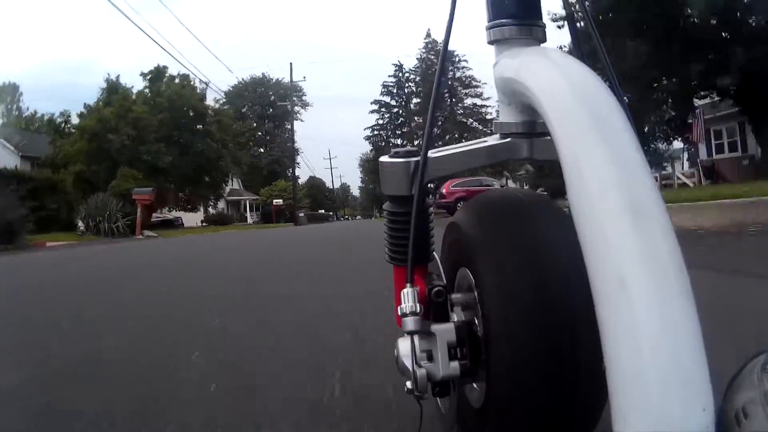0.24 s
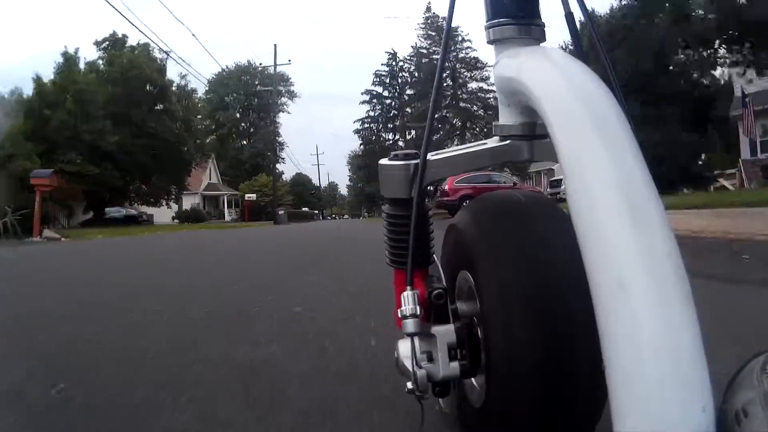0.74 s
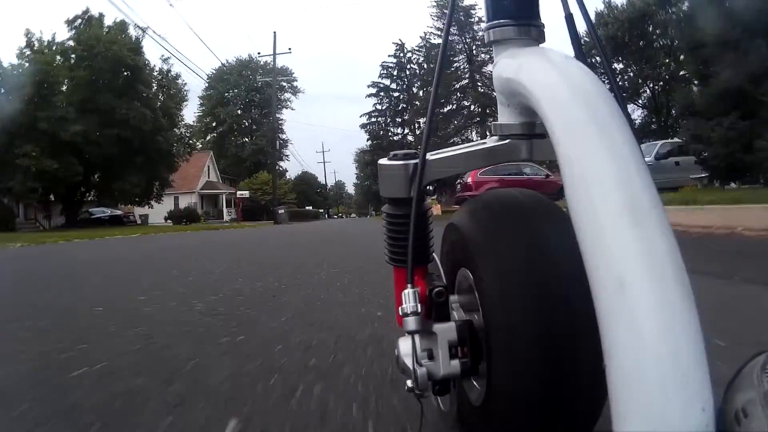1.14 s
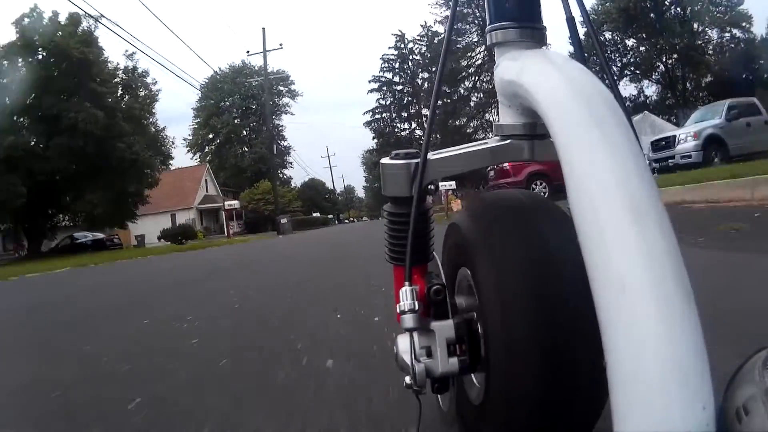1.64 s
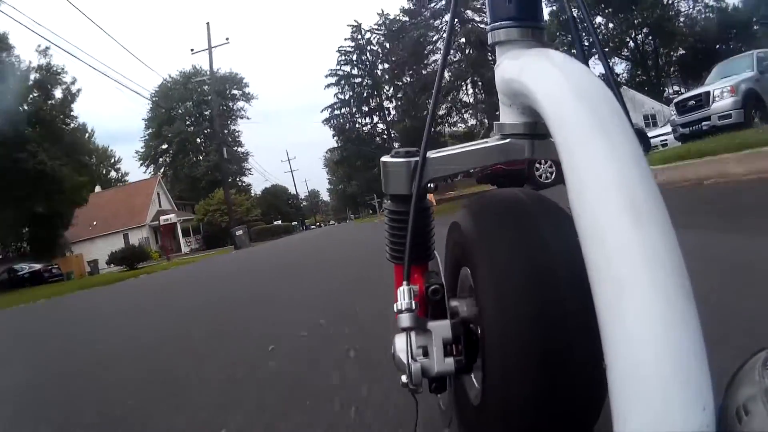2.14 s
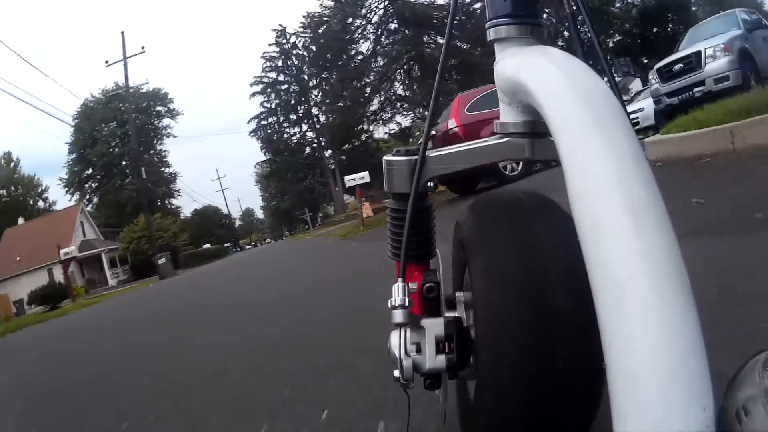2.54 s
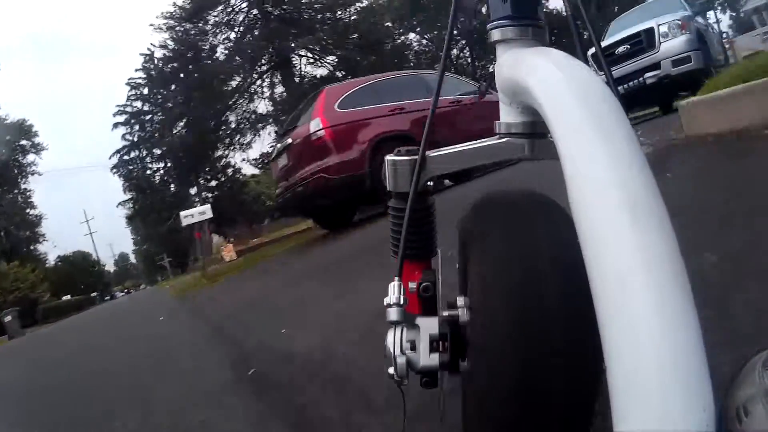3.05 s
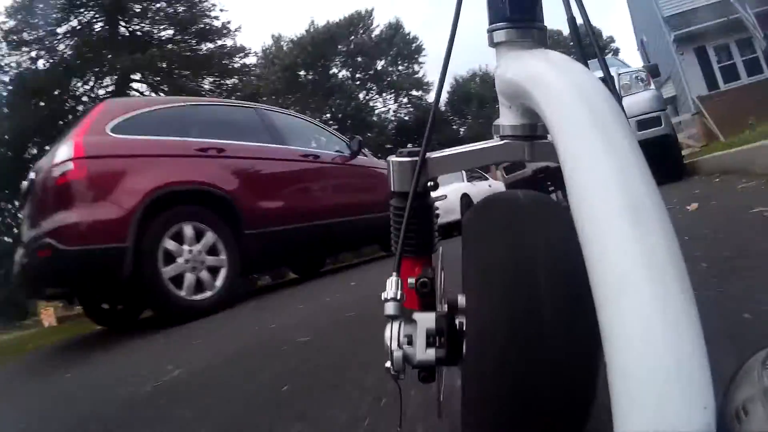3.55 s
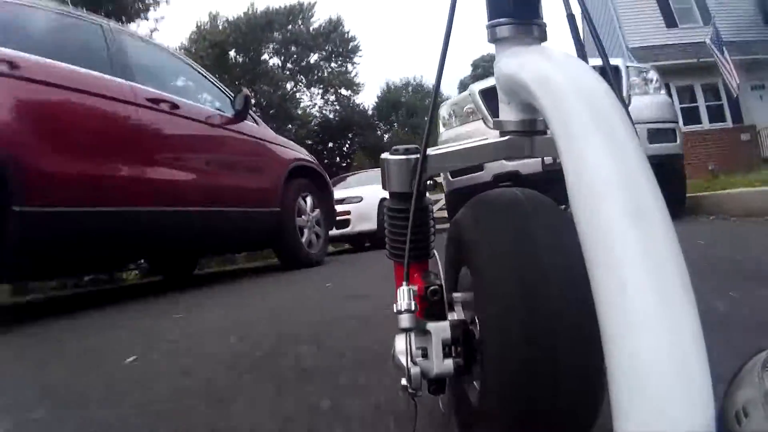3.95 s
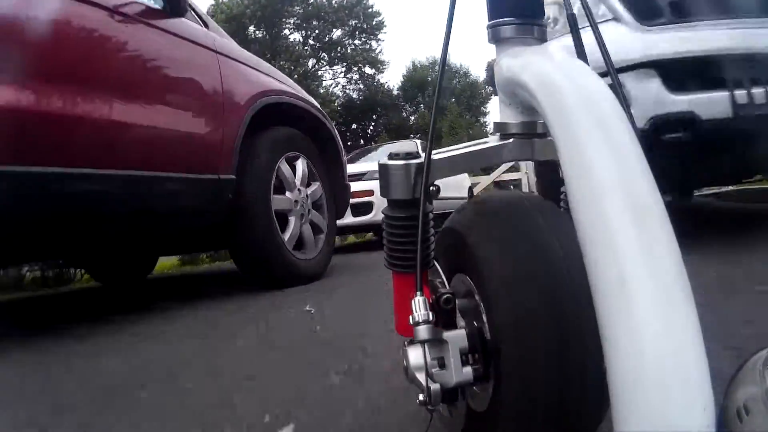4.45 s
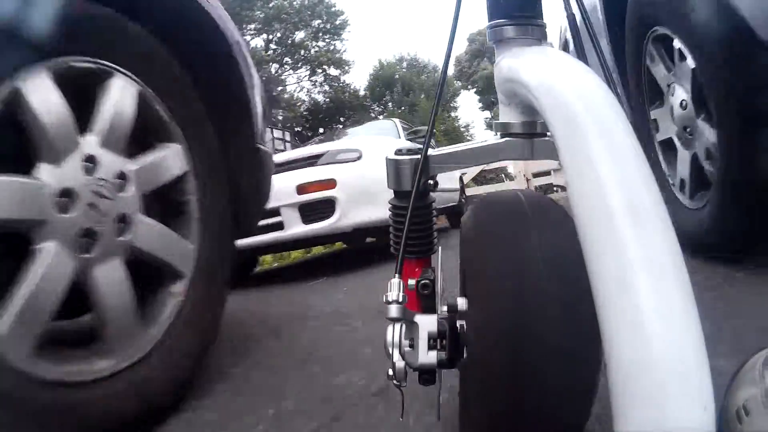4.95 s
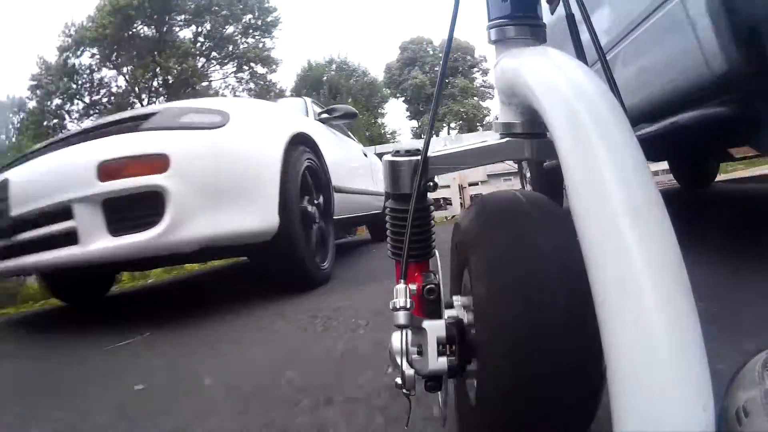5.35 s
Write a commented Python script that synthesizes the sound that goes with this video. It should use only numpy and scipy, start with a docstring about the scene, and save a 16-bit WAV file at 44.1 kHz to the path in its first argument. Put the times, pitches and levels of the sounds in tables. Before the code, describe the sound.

A small two-stroke scooter engine starts loud and distorted, winds down in pitch and level, then settles into a quiet, uneven buzzing idle.

```python
"""A small two-stroke scooter slows down a street and rolls on near idle, heard from its own frame.
Engine: uneven pops and gated gas noise through an exhaust and frame response, plus a hum of crank orders.
Drive: a gliding, throbbing tone. Metal: scratch envelopes on coloured noise. Fork: noise puffs and thuds.
Frame and road: resonant noise and low rumble. The loud start overloads the microphone into flat tops."""
import sys
import numpy as np
from scipy import signal
from scipy.io import wavfile
from scipy.ndimage import uniform_filter1d

SR = 44100
rng = np.random.default_rng(int(sys.argv[2]) if len(sys.argv) > 2 else 0)


def makeup_ratio(level_db):
    """Linear amplitude ratio for a level in decibels (20 dB per factor of ten)."""
    decades = np.asarray(level_db, float) / 20
    return 10 ** decades


def digitize_waveform(pressure):
    """Quantize a signal to 16-bit integers and store it at the path in sys.argv[1].

    Rows of a 2-D input are taken as channels; values are limited to [-1, 1].
    """
    field = np.atleast_2d(pressure).T
    bounded = np.clip(field, -1, 1)
    quanta = np.round(bounded * 32767).astype(np.int16)
    wavfile.write(sys.argv[1], SR, quanta)


N = 246519  # samples


def evened(x):
    """Scales to rms 1."""
    return x / np.sqrt(np.mean(x ** 2) + 1e-20)


def along(rows):
    """Interpolates each column of a time table to one value a sample."""
    s, *columns = np.transpose(rows)
    return [np.interp(np.arange(N) / SR, s, c) for c in columns]


def drift(hz):
    """Low-passed noise of rms 1 with corner hz, for slow random modulation."""
    lowpass = signal.butter(2, hz, fs=SR, output="sos")
    return evened(signal.sosfilt(lowpass, rng.standard_normal(N + SR))[SR:])  # skips the filter's onset


def causal(points, rings=()):
    """Minimum-phase impulse response of a (Hz, dB) spectrum with resonant peaks on top."""
    hz = abs(np.fft.fftfreq(8192, 1 / SR))
    f, db = np.transpose(points)
    gain_db = np.interp(np.log(hz + 1), np.log(f + 1), db)
    for centre_hz, width_hz, peak_db in rings:
        gain_db = gain_db + peak_db / (1 + (2 * (hz - centre_hz) / width_hz) ** 2)
    log_gain = np.log(makeup_ratio(gain_db))
    phase = -signal.hilbert(log_gain).imag
    return np.fft.ifft(np.exp(log_gain + 1j * phase)).real[:4096]


def body():
    """Impulse response of exhaust and frame: a broad colour with ringing peaks."""
    # exhaust colour: (frequency [Hz], relative gain [dB])
    exhaust = [(20, -25.5), (60, -20.5), (100, -2.5), (220, -6), (500, -7.5), (950, -20), (1500, -27.5),
               (2100, -33.5), (2600, -41), (3200, -52), (4200, -61), (6000, -79), (9000, -94), (15000, -76)]
    # ringing of pipe and frame on top: (centre [Hz], width [Hz], peak [dB])
    rings = [(512, 180, 3.5), (1271, 314, 12), (1780, 380, 8), (749, 54, 3.5), (960, 72, 2)]
    return causal(exhaust, rings)


def struck(times_s, peaks_db, shape):
    """Places shape at each time with its peak level."""
    train = np.zeros(N)
    train[np.round(times_s * SR).astype(int)] = makeup_ratio(peaks_db)
    return signal.oaconvolve(train, shape / abs(shape).max())[:N]


def beats(turns, count, jitter, spread_db):
    """Clicks count times a turn, each a little off its place and of its own size."""
    luck = np.clip(rng.standard_normal((N // 64, 2)), -2, 2)[(count * turns).astype(int)]
    phase = (count * turns - jitter * luck[:, 1]) % 1
    return makeup_ratio(spread_db * luck[:, 0]) * (np.diff(phase, prepend=0) < -.5)


def burst(rise_s, fall_s):
    """Envelope of a short scratch: exponential rise and decay."""
    t = np.arange(500) / SR
    return (1 - np.exp(-t / rise_s)) * np.exp(-t / fall_s)


def lulls():
    """Brief Gaussian dips of the level, in dB."""
    # dips: (time [s], depth [dB], half width to 1/e [s])
    dips = [(.452, 4.5, 0.057), (0.727, 5.5, 0.024), (1.894, 4, 0.11), (2.722, 5, 0.012), (3.6, 0.5, 0.018),
            (3.721, 4, 0.041), (3.95, 2.5, 0.018), (5.311, 4.5, 0.01)]
    t = np.arange(N) / SR
    return sum(-db * np.exp(-((t - s) / width) ** 2) for s, db, width in dips)


def road():
    """Low lumpy rumble of tyres and air: band-passed noise of drifting level."""
    band = signal.butter(2, [15, 65], "band", fs=SR, output="sos")
    low = signal.sosfilt(band, rng.standard_normal(N))
    return makeup_ratio(-43.0 + 1.7 * drift(5.6)) * evened(low)


def hollow(turns):
    """Hollow ring of the frame, fed by the engine's shaking: resonant noise, throbbing once a turn."""
    # resonance: (time [s], centre [Hz], level [dB])
    resonance = [(0, 1313, -19.5), (.3, 1320, -20.5), (.7, 1356, -24.5), (.75, 1316, -26), (1, 1343, -29.5),
                 (1.4, 1340, -28.5), (1.9, 1336, -32), (2.3, 1322, -34.5), (2.7, 1350, -33),
                 (3.1, 1340, -34), (3.5, 1290, -34.5), (3.9, 1330, -37.5), (4.3, 1280, -36.5),
                 (4.8, 1313, -33), (5.2, 1344, -38), (5.59, 1295, -33)]
    width_hz, throb = 256, 0.37
    hz, level_db = along(resonance)
    carrier = np.exp(2j * np.pi * np.cumsum(hz) / SR)
    pole = np.exp(-np.pi * width_hz / SR)
    # filter around 0 Hz, then shift up to the moving centre
    low = signal.lfilter([1], np.poly([pole, pole]), rng.standard_normal(N) / carrier)
    swell = 1 + throb * np.cos(2 * np.pi * (turns - .2))
    return makeup_ratio(level_db + lulls()) * swell * evened((low * carrier).real)


def jolts():
    """Jolts through the fork: puffs of frame noise with a bright edge, over a thud and a low push."""
    # jolts: (time [s], peak level [dB], thud and push against puff [ratio], puff decay [s])
    hits = [(0.494, -6, 0.041, 0.0031), (0.836, -6, .05, 0.002), (1.24, -3, 0.11, 0.0041),
            (2.068, -16, 0.057, 0.0037), (2.273, -12, .02, 0.015), (2.329, -10, .02, 0.005),
            (2.369, -14.5, 0.023, 0.0068), (3.137, -7, 0.76, 0.0035), (3.225, -18.5, .2, 0.002),
            (3.335, -18, .03, 0.0036), (3.363, -10, 0.043, 0.012), (3.436, -9, 0.077, 0.0029),
            (3.641, -12.5, .05, 0.0057), (4.119, -15, .05, 0.0045), (4.236, -16, 0.12, 0.007)]
    push_hz, thud_hz = 28, 140
    t = np.arange(3000) / SR
    push = .5 * np.sin(2 * np.pi * push_hz * t) * np.exp(-t / 0.018)
    push = push - np.sin(2 * np.pi * thud_hz * t) * np.exp(-t / 0.009)
    out = np.zeros(N)
    for s, peak_db, depth, decay_s in hits:
        noise = signal.oaconvolve(rng.standard_normal(3000), body())[:3000]
        hiss = uniform_filter1d(rng.standard_normal(3000), size=3)
        puff = noise + 6 * np.gradient(noise) + 0.032 * depth * noise.std() * hiss
        puff = puff * (1 - np.exp(-t / (0.5 * decay_s))) * np.exp(-t / decay_s)
        out += struck(np.array([s]), peak_db, puff / abs(puff).max() + depth * push)
    return out


def ticks(turns):
    """Short metal scratches: the clear ones, a snap at each firing and light ticks between."""
    # clear ticks: (time [s], envelope peak before colouring [dB])
    clinks = [(0.1428, -18.5), (0.1806, -31), (0.2264, -25.5), (0.292, -13.5), (0.3183, -15.5),
              (0.3561, -20), (0.4394, -24.5), (0.4893, -24), (0.5467, -22), (0.5752, -15), (0.6526, -17.5),
              (0.7192, -33), (0.7538, -22), (0.7848, -21), (0.8355, -18), (0.8645, -24.5), (0.8801, -19),
              (0.9221, -26.5), (0.9617, -24.5), (0.9817, -32), (1.043, -23.5), (1.1026, -28.5),
              (1.126, -18.5), (1.177, -30.5), (1.1961, -28), (1.2382, -29.5), (1.2817, -34), (1.3124, -30),
              (1.3318, -32), (1.398, -30), (1.502, -36.5), (1.5369, -31), (1.5526, -28), (1.584, -34.5),
              (1.6158, -38), (1.6325, -25.5), (1.716, -39), (1.731, -25.5), (1.768, -38), (1.7829, -27.5),
              (1.8372, -38), (1.8432, -36), (2.0118, -33), (2.0577, -31), (2.1211, -43), (2.134, -35.5),
              (2.1858, -31.5), (2.2318, -28), (2.2872, -47), (2.3267, -32.5), (2.367, -36), (2.5651, -38),
              (2.6518, -38), (2.6758, -38.5), (2.6972, -27.5), (2.8745, -31), (2.8928, -25.5),
              (2.9983, -38.5), (3.047, -34.5), (3.127, -34.5), (3.1333, -25.5), (3.1652, -37),
              (3.224, -37.5), (3.2503, -32), (3.3315, -45), (3.4331, -36), (3.5039, -38.5), (3.5436, -31.5),
              (3.576, -34.5), (3.6192, -58), (3.647, -44), (3.7669, -31), (3.8157, -35), (3.8674, -40),
              (3.9577, -44), (3.9823, -39), (4.0492, -36), (4.1215, -35), (4.1413, -40.5), (4.2017, -34.5),
              (4.2644, -39.5), (4.2844, -32.5), (4.3455, -25.5), (4.4102, -35.5), (4.4646, -35),
              (4.5131, -33), (4.7147, -39.5), (4.7591, -29), (4.797, -38), (4.816, -39.5), (4.8339, -31.5),
              (4.8556, -30), (4.8678, -38.5), (4.915, -31), (4.9542, -48), (4.972, -29), (4.9946, -35),
              (5.038, -33.5), (5.119, -38), (5.2234, -33.5), (5.2666, -33), (5.2826, -28.5),
              (5.4132, -35.5), (5.441, -31), (5.479, -41)]
    # running gear: (time [s], snap level [dB], light tick level [dB], fitfulness of light ticks [dB])
    chatter = [(0.0, -31.5, -33, 7.5), (0.2, -42, -36.5, 9), (0.36, -37, -35, -4.5), (.45, -41, -41, 11),
               (.6, -40.5, -36.5, 3), (.8, -39, -45.5, 6), (0.98, -41, -50.5, -1), (1.3, -47, -55.5, 1),
               (1.6, -48.5, -61, 17), (1.93, -51, -57.5, 13), (2.22, -44.5, -57, -2), (2.49, -53, -58, 6.5),
               (3.0, -57, -61, 12), (3.32, -53.5, -60, 4), (3.63, -64.5, -62, 18.5), (4.09, -73, -60, -7),
               (4.44, -56, -48.5, 12), (4.6, -64.5, -53.5, 11), (4.93, -47, -47, 2.5),
               (5.06, -52, -57, -1.5), (5.26, -58.5, -54, 5), (5.59, -77, -60, 11)]
    # colour of clear and light ticks: (frequency [Hz], relative gain [dB])
    tick_colour = [(500, -35.5), (1800, 10), (2800, -5), (3900, 2), (4800, -8), (6300, -21.5),
                   (8000, -26.5), (11000, -40), (15000, -53.5)]
    # colour of snaps: (frequency [Hz], relative gain [dB])
    snap_colour = [(500, -21), (1800, 7.5), (2800, 2), (3900, -1.5), (4800, -10.5), (6300, -25.5),
                   (8000, -34.5), (11000, -35.5), (15000, -44)]
    snap_at, light_at = .05, .6  # turns
    rattle_db, rattle_hz = 1.2, 15  # swell of the snaps
    grouping_db, fits_hz = 4, 12  # gathering and fits of the light ticks
    edge_per_octave = 1  # extra treble per octave of crank speed above 50 turns/s

    snap_db, light_db, fits_db = along(chatter)
    dips_db = 1.2 * lulls()
    snap_db = snap_db + dips_db + rattle_db * drift(rattle_hz)
    light_db = light_db + dips_db + grouping_db * np.cos(2 * np.pi * (turns - light_at))
    light_db = light_db + fits_db * np.minimum(drift(fits_hz), 1)

    clear = struck(*np.transpose(clinks), burst(0.0004, 0.001))
    snap_clicks = beats(turns - snap_at + 1, count=1, jitter=.03, spread_db=2.8)
    snaps = signal.oaconvolve(snap_clicks, burst(.0004, .0018))[:N]
    light_clicks = beats(turns, count=4, jitter=0.12, spread_db=2.8)
    light = signal.oaconvolve(light_clicks, burst(0.0002, 0.0006))[:N]

    tick_envelope = clear + evened(light) * makeup_ratio(light_db)
    snap_envelope = evened(snaps) * makeup_ratio(snap_db)
    out = np.zeros(N)
    for envelope, points in ((tick_envelope, tick_colour), (snap_envelope, snap_colour)):
        colour = causal(points)
        scratch = envelope * rng.choice([-1., 1.], N)
        out += signal.oaconvolve(scratch, colour / np.linalg.norm(colour))[:N]
    octaves = np.maximum(np.log2(np.gradient(turns) * SR / 50), 0)
    return out - edge_per_octave * octaves * np.gradient(np.gradient(out))


def drone(turns):
    """Drone of the drive while braking: a wavering tone, throbbing at half the crank speed."""
    # glide: (time [s], frequency [Hz], level [dB])
    glide = [(1.55, 492, -46), (1.64, 486, -34), (1.68, 483, -21), (1.76, 472, -29.5), (1.876, 455, -29),
             (1.999, 436, -61), (2.08, 424, -28), (2.124, 421, -25), (2.221, 412, -26.5), (2.311, 403, -22),
             (2.385, 398, -21.5), (2.42, 394, -28.5), (2.55, 382, -27), (2.68, 370, -27), (2.717, 372, -40),
             (2.762, 392, -27), (2.861, 397, -31), (2.95, 398, -36), (3.061, 402, -27.5),
             (3.201, 405.6, -47), (3.294, 393, -18), (3.322, 394, -36), (3.354, 394, -19.5),
             (3.393, 385, -37), (3.43, 377, -29), (3.6, 360, -41)]
    hz, level_db = along(glide)
    t = np.arange(N) / SR
    sounding = np.clip(np.minimum(t - glide[0][0], glide[-1][0] - t) / 0.017, 0, 1)
    tone = np.cos(2 * np.pi * np.cumsum(hz) / SR + .55 * drift(18))
    throb = 1 + .5 * np.cos(np.pi * turns)
    return np.sqrt(2) * makeup_ratio(level_db + 1.4 * drift(42)) * throb * sounding * tone


def hum(turns, level_db, shake_db, even):
    """Once-a-turn shake and the clean low orders above it, lined up into one rounded push a turn."""
    # orders against the second: (time [s], third [dB], fourth [dB], fifth [dB])
    order_mix = [(0, -6.5, -4, -11), (.2, -11, -5.5, -7), (.35, -3.5, 0.5, 3.5), (.6, -8, -2.5, 5.5),
                 (.75, -11, -1, -5.5), (1.05, -12, 1, 0), (1.4, -1, -2.5, -5), (1.75, -5, -6.5, -2),
                 (2.1, -2.5, 0.5, -13), (2.8, -1, -3, -10.5), (3.6, 4, 2, -4.5), (4.2, -3, -0.5, -9),
                 (4.6, -1, -2, -16), (5.0, -1.5, -1, -13.5), (5.59, -5.5, -5, -8)]
    fall_db = -3  # each order above the fifth
    waver_db = 1  # each order swells and fades on its own
    third_db, fourth_db, fifth_db = along(order_mix)
    orders_db = [0, third_db, fourth_db] + [fifth_db + fall_db * k for k in range(3)]
    out = np.sqrt(2) * makeup_ratio(shake_db + 0.82 * drift(15)) * np.cos(2 * np.pi * turns - 1.13)
    for k, order_db in enumerate(orders_db, start=2):
        swell_db = waver_db * np.minimum(drift(6.8), 1.2) + 2.1 * (1 - even) * drift(22.0)
        phase = 2 * np.pi * k * turns - 1.08 * k + .5 * (1 - even) * drift(19.0)
        out = out + np.sqrt(2) * makeup_ratio(level_db + order_db + swell_db) * np.cos(phase)
    return out


def engine(turns, level_db, even):
    """One pop a turn of uneven strength, and the rush of gas that swells around each pop."""
    # pops against the engine level: (time [s], level [dB])
    pop_level = [(0, -12.5), (.4, -11.5), (.75, -8.5), (1, -8.5), (1.3, -7), (1.7, -14), (2.5, -10),
                 (3.8, -14), (4.4, -7), (5.1, -17), (5.59, -13.5)]
    least_uneven_db, uneven_db = 1.5, 2.5  # least spread of the firings, and what evenness 0 adds
    luck = np.clip(rng.standard_normal((N // 256, 2)), -1.8, 1.8)[(turns + .5).astype(int)]
    strength = makeup_ratio((least_uneven_db + uneven_db * (1 - even)) * luck[:, 0])
    pops = -strength * (np.diff((turns - .05 * luck[:, 1]) % 1, prepend=0) < -.5)
    # the faster the crank, the more the rush gathers at the firing
    gather = np.clip(0.55 + 4.07 * np.log2(np.gradient(turns) * SR / 50), 0, 5)
    gate = 1.46 + strength * np.exp(gather * (np.cos(2 * np.pi * (turns - .1)) - 1))
    rush = gate * makeup_ratio(1.3 * drift(28.6)) * rng.standard_normal(N)
    pops, rush = (evened(signal.oaconvolve(v, body())[:N]) for v in (pops, rush))
    # faster gas is brighter
    edge = np.clip(5.7 * (gather - 1.3), 0, 8)
    rush = rush + edge * np.gradient(uniform_filter1d(rush, 6))
    return makeup_ratio(level_db) * (makeup_ratio(along(pop_level)[0]) * pops + makeup_ratio(-3.5) * rush)


def scene():
    """Everything reaches one microphone on the frame."""
    # engine: (time [s], exhaust level [dB], evenness of firings [0-1], second-order hum level [dB],
    #          once-a-turn frame shake level [dB])
    engine_course = [(0, -7.5, 0.5, -8, -34), (.07, -9, 1, -11.5, -23), (.3, -9.5, 0.81, -18, -23.5),
                     (.45, -9.5, 1, -41, -26), (.62, -10.5, 0.32, -21.5, -20.5),
                     (.75, -11.5, 0.27, -23.5, -27.5), (1.0, -13.5, 0.94, -24, -24),
                     (1.2, -15, 1, -42.5, -30), (1.42, -16, 0.7, -28, -28), (1.65, -18.5, 0, -28, -33),
                     (1.82, -15, 0.6, -28.5, -34), (2.15, -18.5, 0.9, -34, -38),
                     (2.4, -20.5, 0.6, -38.5, -50), (2.7, -23, 0, -33.5, -53.5),
                     (2.94, -22, 1, -31.5, -44.5), (3.2, -21, 0, -37, -42), (3.4, -24, 0, -33.5, -49),
                     (3.58, -24, 0, -37, -42), (3.9, -23.5, 0, -34.5, -45), (4.25, -21, 0.1, -30, -46),
                     (4.6, -22.5, 0.9, -29, -47), (4.9, -20.5, 1, -27, -45), (5.36, -23, 0, -31.5, -44),
                     (5.59, -22.5, 0, -30, -51)]
    # crank speed: (time [s], speed [turns/s])
    crank_speed = [(0, 81.9), (.2, 77.8), (.4, 74.4), (.6, 70.4), (.8, 68), (1, 67.6), (1.2, 66.6),
                   (1.4, 63.1), (1.6, 59.8), (1.8, 55.6), (2, 50.9), (2.2, 50.9), (2.4, 47.1), (2.6, 44.4),
                   (2.8, 46.3), (3, 47.5), (3.2, 46.9), (3.4, 43.2), (3.6, 41.8), (3.8, 40.8), (4, 43.4),
                   (4.2, 48.3), (4.4, 49.8), (4.6, 48.9), (4.8, 49.7), (5, 49.3), (5.2, 47.4), (5.4, 46.5),
                   (5.59, 48.5)]
    level_db, even, hum_db, shake_db = along(engine_course)
    even = np.clip(even, 0, 1)
    turns = np.cumsum(along(crank_speed)[0]) / SR
    mix = road() + hollow(turns) + jolts() + ticks(turns) + drone(turns)
    mix = mix + hum(turns, hum_db, shake_db, even) + engine(turns, level_db + lulls(), even)
    return mix[None]


def roll_off(x):
    """The treble ends steeply here."""
    return signal.sosfilt(signal.butter(12, 14600, fs=SR, output="sos"), x)


def record(dry):
    """The input loses its deepest bass, overloads with flat tops and adds a faint hiss."""
    highpassed = signal.lfilter(*signal.butter(1, 20, "high", fs=SR), dry)
    flat = np.clip(highpassed, -.5, .5)
    mix = flat + makeup_ratio(-75.5) * rng.standard_normal(dry.shape)
    return roll_off(mix)


dry = scene()
out = record(dry)
digitize_waveform(out)
```